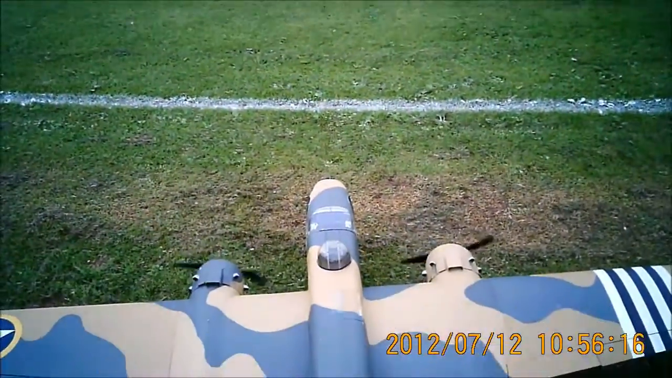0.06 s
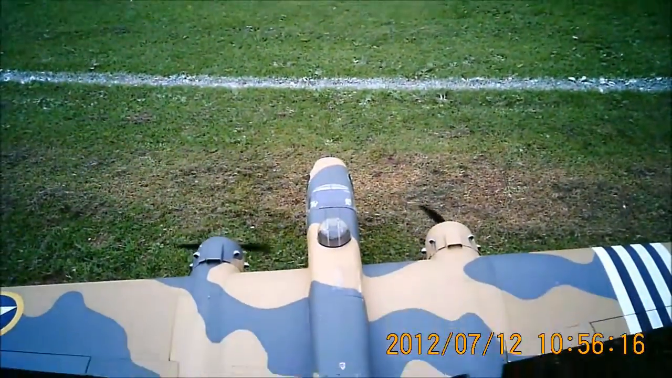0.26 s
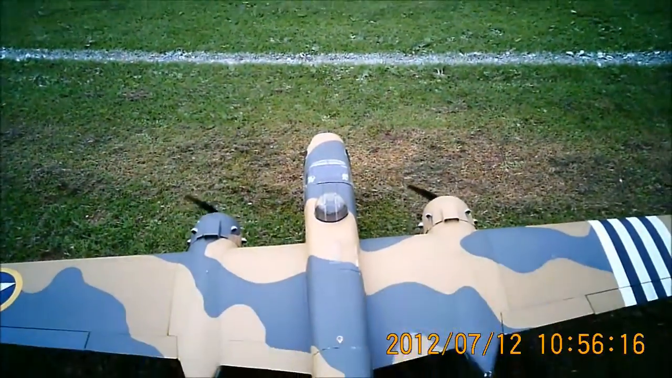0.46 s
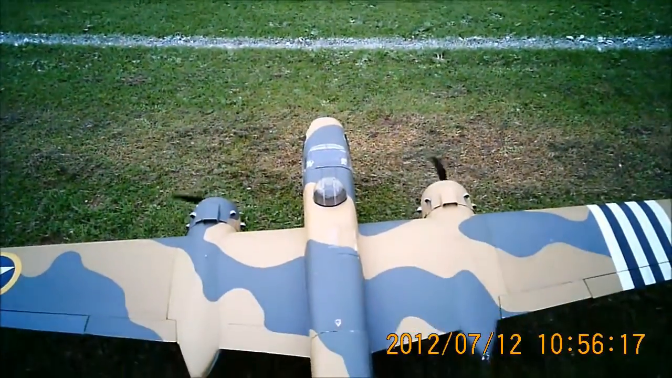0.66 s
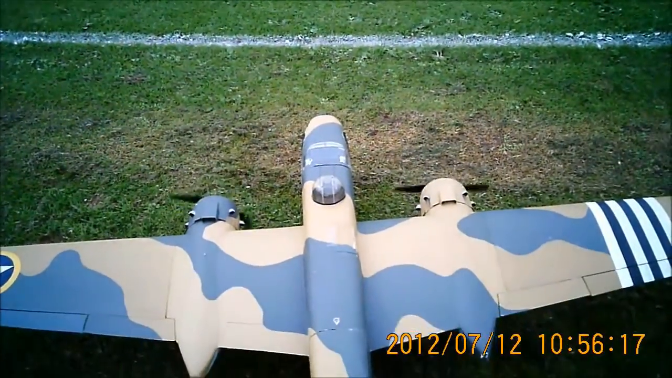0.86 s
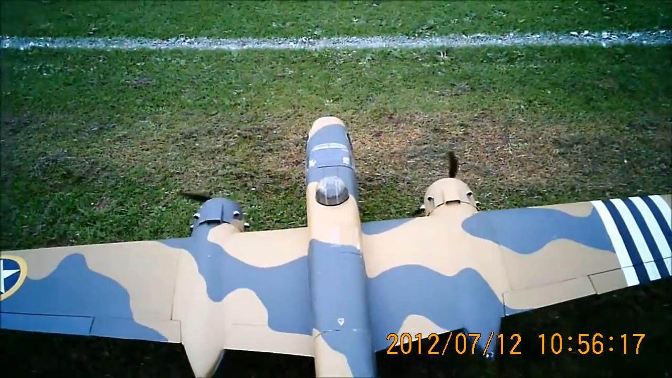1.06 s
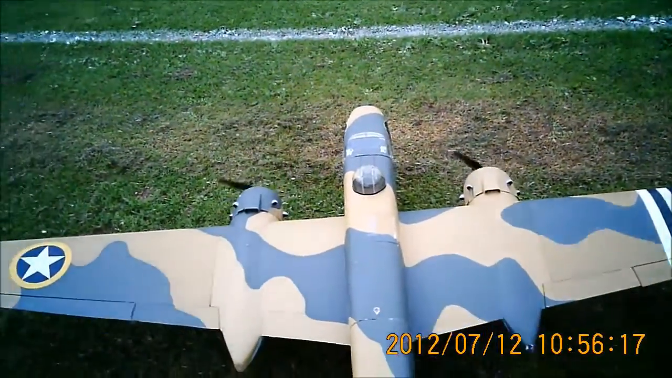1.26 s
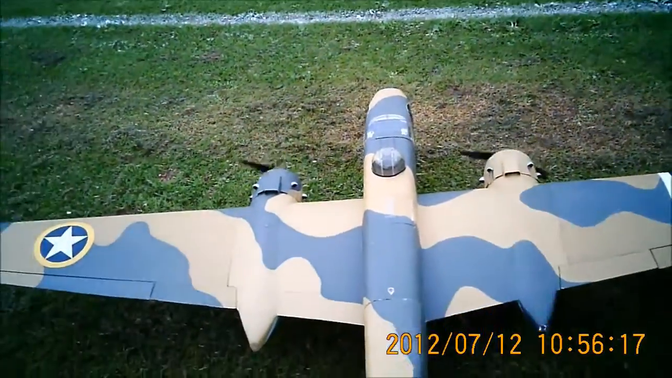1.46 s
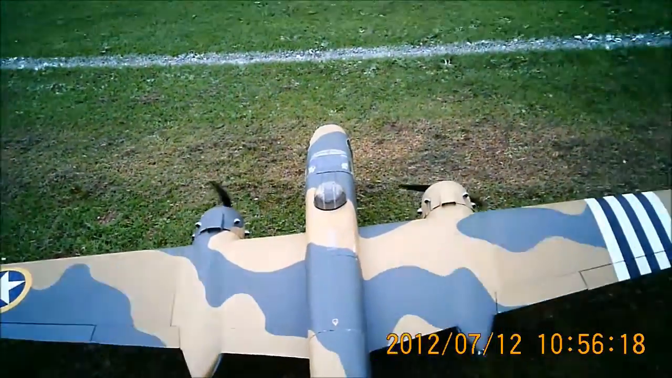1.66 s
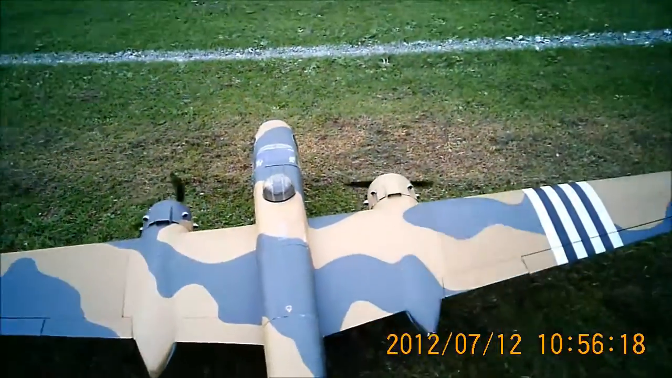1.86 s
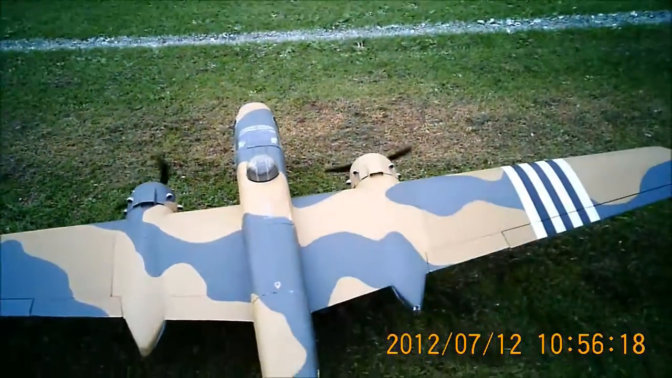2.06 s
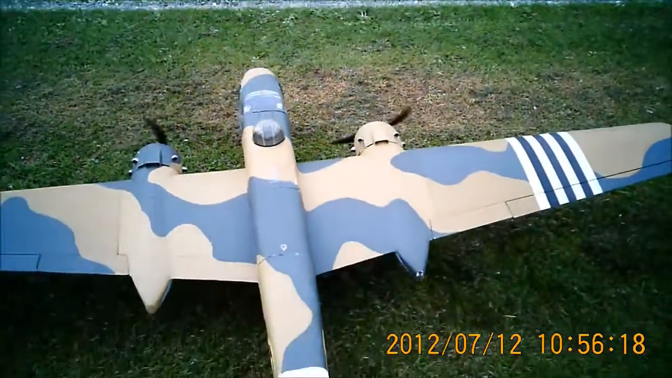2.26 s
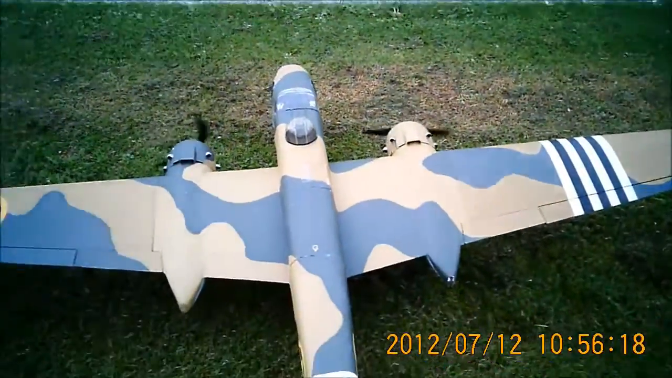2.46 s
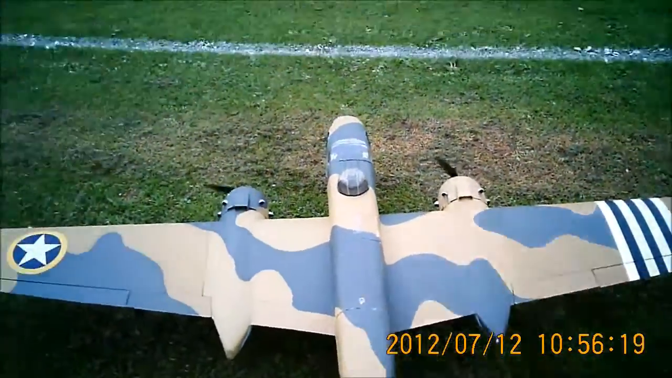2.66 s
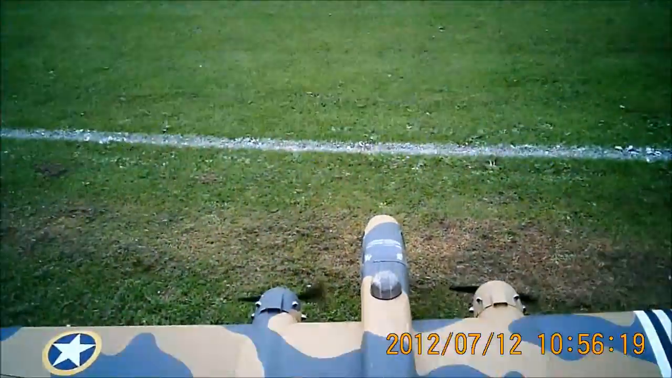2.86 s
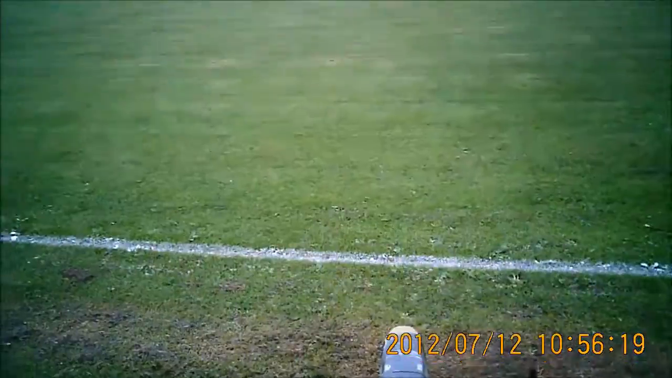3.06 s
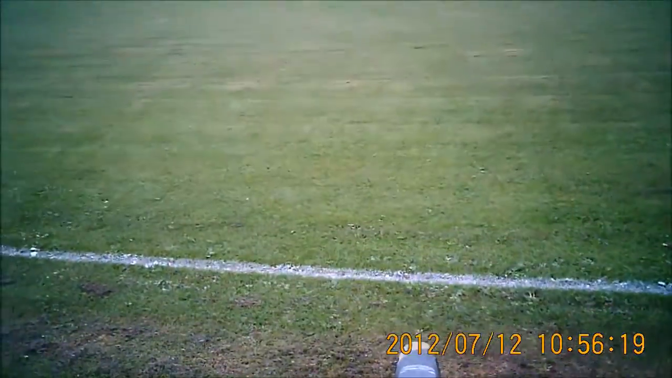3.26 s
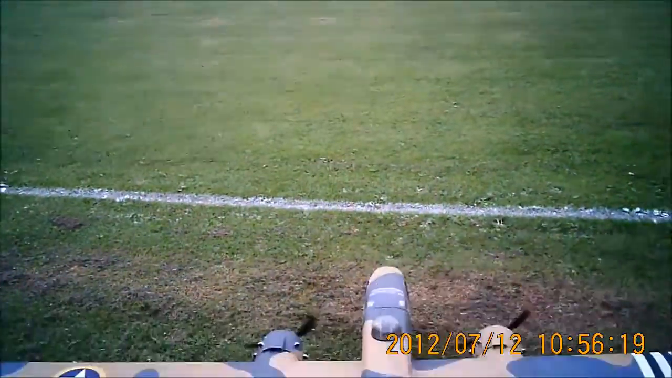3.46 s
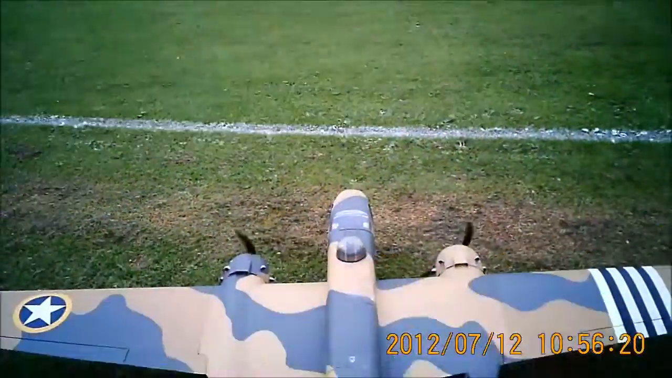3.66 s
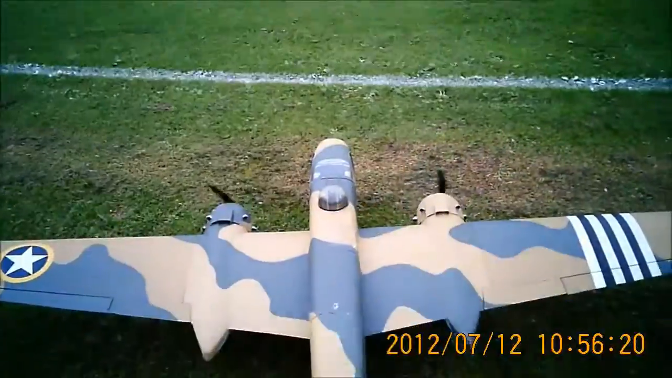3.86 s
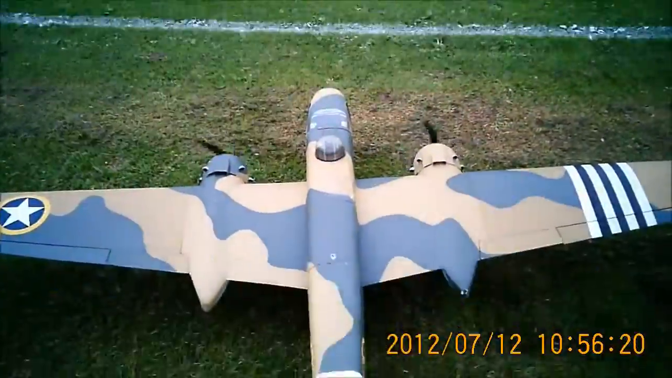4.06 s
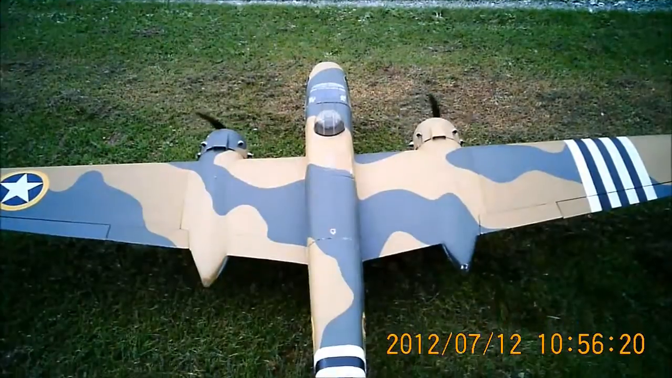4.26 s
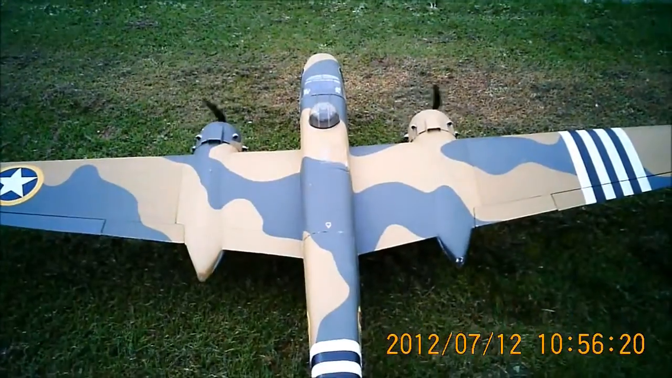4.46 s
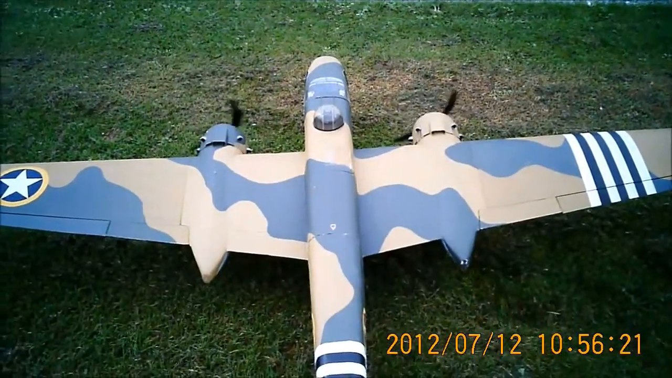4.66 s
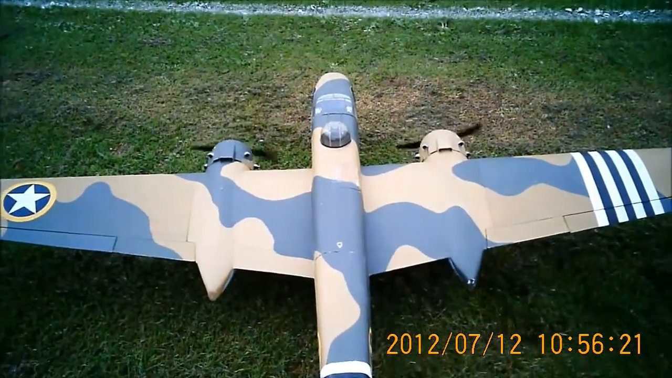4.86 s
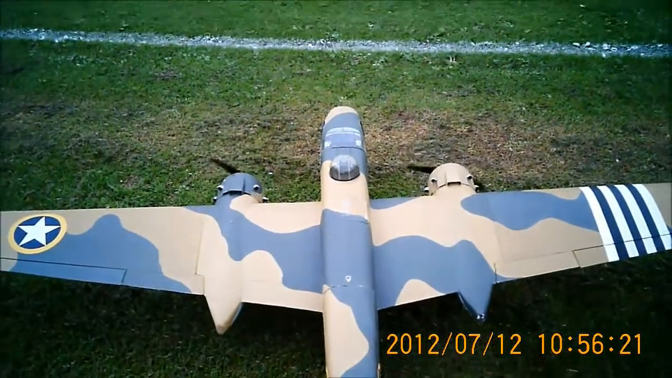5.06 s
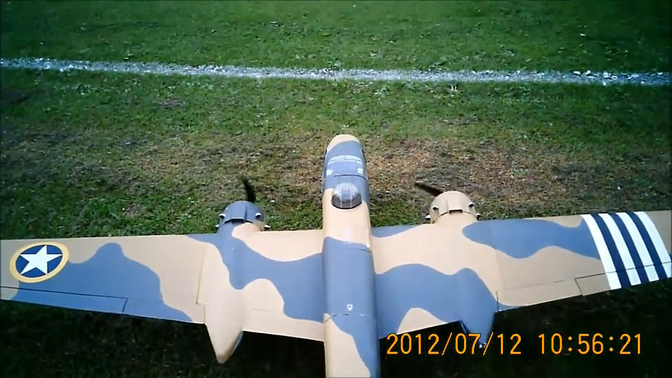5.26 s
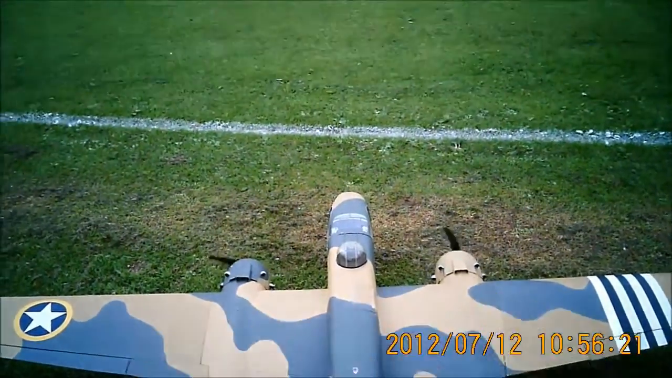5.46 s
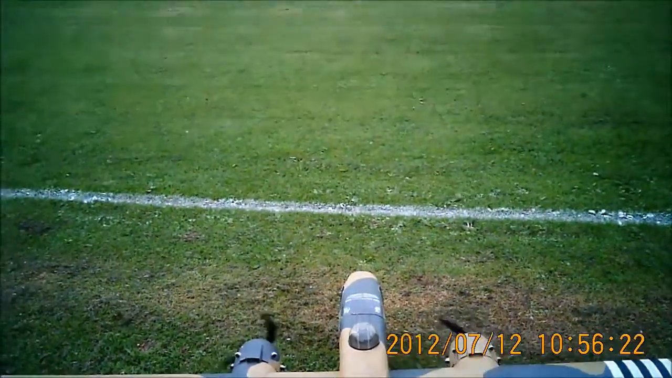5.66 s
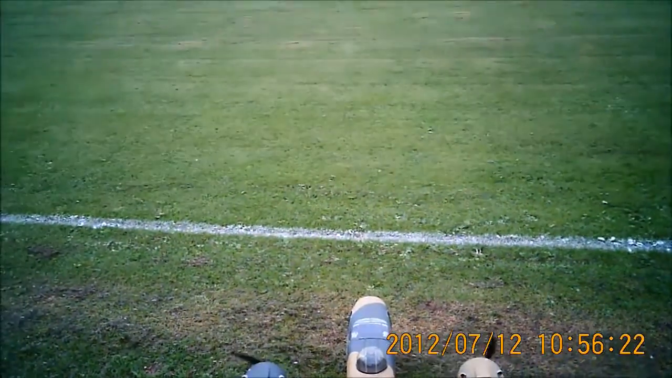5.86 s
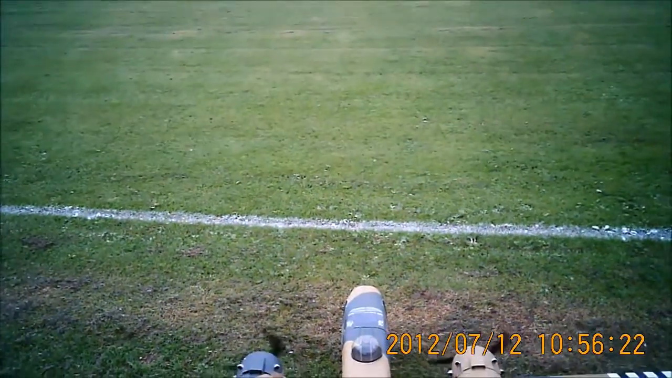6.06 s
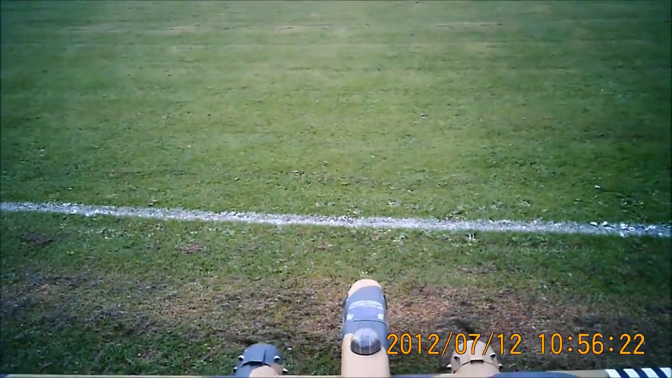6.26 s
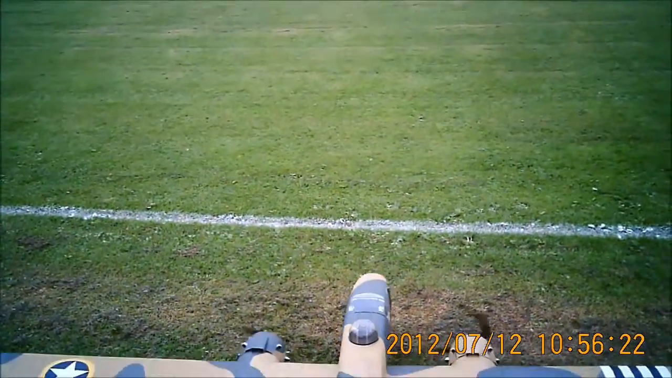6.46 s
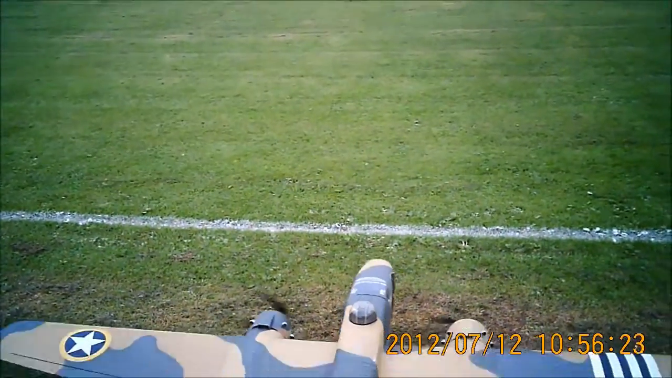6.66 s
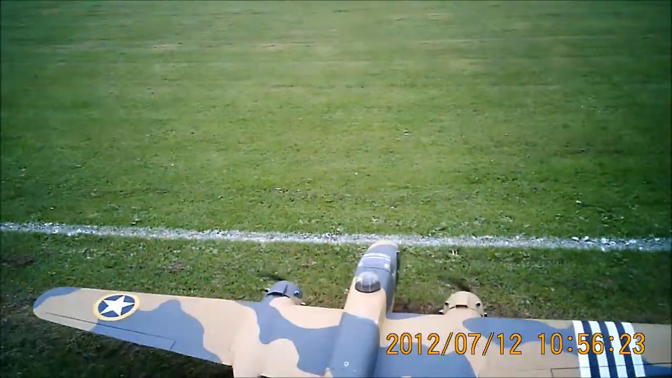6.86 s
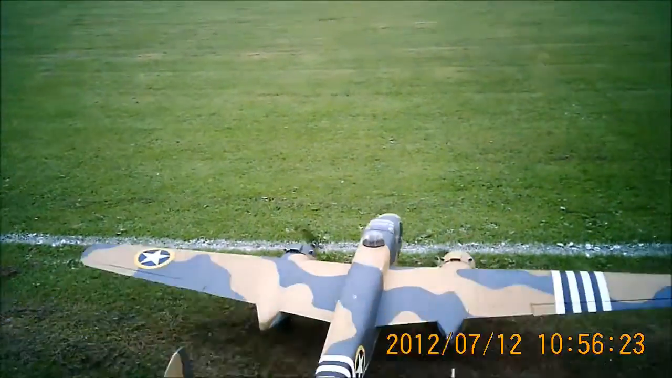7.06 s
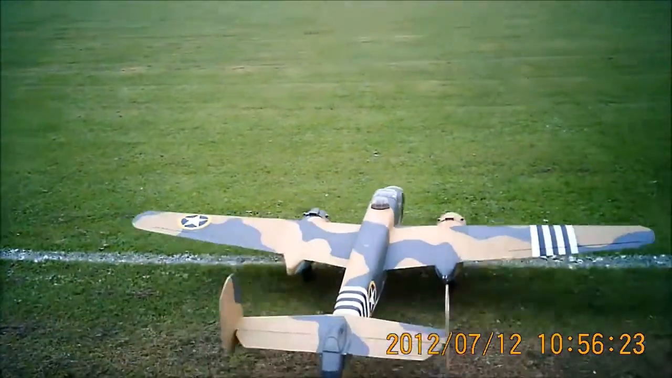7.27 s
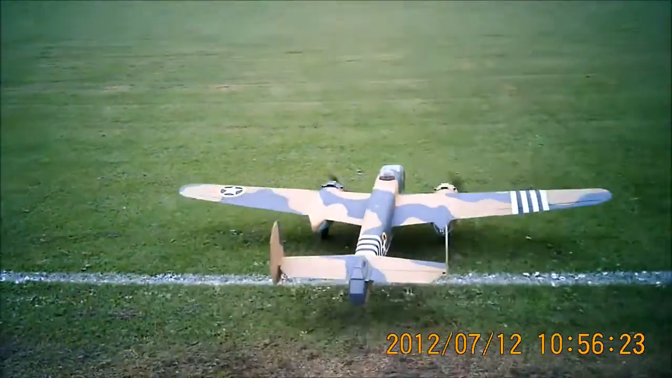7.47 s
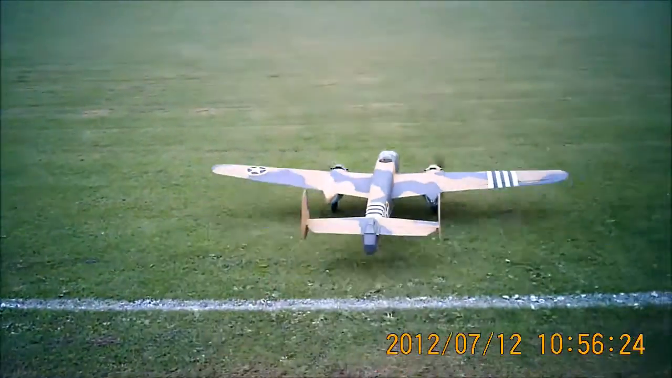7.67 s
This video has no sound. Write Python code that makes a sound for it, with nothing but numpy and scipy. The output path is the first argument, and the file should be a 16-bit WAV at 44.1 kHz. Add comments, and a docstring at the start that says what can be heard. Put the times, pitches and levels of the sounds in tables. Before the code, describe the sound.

Two small electric motors whirr unevenly with raspy bearings and faint high whistle, then surge upward in pitch to a loud buzzing propeller drone that recedes.

```python
"""A dull two-motor whine beats against itself over grassy idle rasp: a twin electric model aircraft,
then throttled up to droning, rushing propellers and rolling away. The motors sing at multiples of two unequal
shaft speeds through airframe resonances; bearings rasp and catch as coloured noise modulated by the turning;
speed controllers whistle as sidebands about a switching tone. Propellers are overtone stacks that grow with
speed, their wash is buffeting noise, and a light wind touches the microphone."""
import sys
import numpy as np
from scipy import signal
from scipy.fft import rfft, irfft, next_fast_len
from scipy.io import wavfile
from scipy.ndimage import uniform_filter1d

SR = 44100
rng = np.random.default_rng(int(sys.argv[2]) if len(sys.argv) > 2 else 0)


def output_pcm(signal):
    """Save a mono or channel-first signal as 16-bit PCM at the path in sys.argv[1].

    Samples are clipped to [-1, 1] before scaling.
    """
    pcm = np.clip(np.atleast_2d(signal).T, -1, 1) * 32767
    wavfile.write(sys.argv[1], SR, np.round(pcm).astype(np.int16))


N = 340011

# throttle-set speed of the motor that picks up first, and of the one that lags: (t/s, speed/(rev/s))
LEAD_SPEED = [(0, 40.4), (2.4, 40.37), (3.3, 40.62), (5.48, 40.42), (5.68, 45.1), (5.94, 47.4),
              (6.14, 83.8), (6.32, 100.9), (6.48, 113.3), (6.68, 116), (7.2, 114.3), (7.71, 113.3)]
LAG_SPEED = [(0, 24.9), (1.7, 24.97), (2.7, 25.6), (5.48, 25.12), (5.74, 28.1), (5.96, 29.3), (6.2, 43.5),
             (6.5, 65), (6.7, 86.3), (6.93, 110.5), (7.08, 113.1), (7.71, 112.2)]
# magnetic and unbalance forces: (multiple of shaft speed, relative idle level/dB, relative loaded level/dB)
LEAD_ORDERS = [(8, -58, -46), (12, -45, -46), (13, -43.5, -41), (14, -39, -41), (16, -44, -49),
               (6, -60, -42), (7, -63, -38), (10, -58, -55), (15, -52, -52), (18, -57, -52), (20, -58, -52),
               (25, -61, -51), (26, -59, -51), (27, -68, -49), (28, -66, -49), (29, -68, -49),
               (37, -59, -56), (42, -59, -50), (49, -63, -64)]
LAG_ORDERS = [(10, -49, -52), (11, -50.5, -50), (12, -38.5, -47), (13, -38.5, -33.5), (14, -46.5, -45),
              (15, -49.5, -52), (9, -55, -55), (16, -54, -50), (24, -56, -52), (25, -52, -47),
              (28, -59, -48), (29, -66, -46), (36, -58, -56), (37, -54.5, -54), (42, -69, -49),
              (47, -61, -62), (49, -55, -64)]
# whine strength: (t/s, lead gain/dB, lag gain/dB)
WHINE_GAIN = [(0, -5, -5), (.6, -1, -3.5), (1.4, 1, -2.5), (2.4, -0.5, 0.5), (5.5, -1, -0.5), (5.9, 4, 3.5),
              (6.1, -3, -6.5), (6.25, -2, 2), (6.8, -2.5, 2)]
# motor current: (t/s, load 0-1)
LOAD = [(0, 0), (5.5, 0), (5.62, 0.16), (5.93, 0.3), (5.97, 0.9), (6.15, 0.98), (7.71, 0.75)]
# resonances of wing, cowls and motor bells: (f/Hz, width/Hz, lift/dB)
AIRFRAME = [(255, 40, 5), (315, 60, 14), (495, 50, 9), (570, 70, 2), (1120, 90, 5), (1250, 60, 4),
            (1480, 70, 4), (1910, 110, 6), (2830, 120, 8), (3020, 100, 6), (4350, 520, 11),
            (5400, 550, -12)]
# a motor bell locks onto one order: (start t/s, length/s, multiple of shaft speed, peak level/dB)
LEAD_SQUEALS = [(0, 0.22, 42, -47), (0, 0.98, 49, -49), (2.75, 0.98, 77, -51), (5.986, .11, 42, -37),
                (6.06, .15, 14, -35), (6.17, .3, 7, -33), (6.19, 0.32, 42, -27), (6.347, 0.098, 28, -25),
                (6.38, .1, 14, -35), (6.38, 0.68, 42, -39.5), (6.9, 1.3, 28, -44), (6.904, 1.1, 14, -41),
                (6.9, 1.2, 42, -47.5)]
LAG_SQUEALS = [(0, 0.23, 13, -30), (.22, .68, 48, -48), (6.08, .16, 15, -32), (6.57, .11, 22, -33),
               (6.66, 0.2, 29, -29), (6.72, 0.27, 42, -33.5), (6.8, .11, 17, -32), (6.85, 1.2, 29, -44),
               (6.91, 0.24, 25, -28.5), (7.31, 0.2, 25, -36.5)]
# two-bladed propeller overtones at full speed: (multiple of shaft speed, relative level/dB)
PROP_ORDERS = [(1, -45.5), (2, -26.5), (3, -37), (4, -37.5), (5, -39), (6, -44)]
# wing boom as the aircraft strains forward: (peak t/s, half length/s, lift/dB)
WING_BOOM = (6.325, .052, 9.5)
# controller whistle: (offset from switching rate/shaft speeds, relative idle level/dB, strained level/dB)
SIDEBANDS = [(0, -58, -50), (2, -67, -57), (-2, -82, -72), (14, -70, -66), (-14, -68, -54),
             (-42, -57, -39.5)]
# colours of bearing rasp and hiss, idle and loaded: (f/Hz, relative density/dB)
IDLE_RASP = [(440, -36), (750, -25), (847, -9), (921, -1), (1110, -11), (1230, -3), (1420, -7),
             (1540, -4.5), (1610, -4.5), (3020, -7), (3350, -12.5), (4110, -4.5), (4860, -12.5), (6030, -9),
             (7000, -17.5), (9100, -25), (15400, -120)]
LOAD_RASP = [(440, -6.5), (750, -8), (1010, 0), (1150, 3), (1970, -3), (2120, 2), (2620, -27), (2830, -1.5),
             (3060, -1), (4500, -16), (5050, -16), (6010, -7), (7500, -22), (9750, -53), (16500, -120)]
IDLE_HISS = [(6500, -22), (7400, -4), (8600, -17.5), (9200, -7.5), (9800, 3), (10300, 0.5), (11100, 2),
             (11750, -7.5), (12350, 3.5), (13000, -14), (14400, -2), (15600, -14)]
LOAD_HISS = [(4120, -12), (7000, -3), (7360, -17), (7960, -14), (8040, -12.5), (10000, 3), (10700, 5),
             (11700, 0.5), (14300, -1), (14900, -11), (15700, -25)]
# idle noise shaded as the microphone swings off the motors and back: (t/s, hiss gain/dB, rasp gain/dB)
SHADE = [(0, -4.5, 1), (.9, .5, 0.5), (2.7, 1, 1.3), (3.0, -3.2, 1.3), (3.35, -3.5, 1.3), (3.65, -0.5, 0.4),
         (5.3, 0, 0.5), (5.8, 0.5, 1.5)]
# sharper catches of a bearing: (t/s, peak gain/dB)
CATCHES = [(0.8734, -30), (1.1212, -28), (6.507, -19)]
# motor bells rung by rough commutation: (f/Hz, relative density/dB)
BELL_GRIT = [(1000, -30), (1500, -9.5), (2300, 1.5), (2850, 6.5), (3500, -22), (4050, 0), (4600, 4),
             (4900, -22)]
# colours of slipstream and of wind: (f/Hz, relative density/dB)
WASH = [(60, -20), (130, -13.5), (220, -3), (300, -6.5), (400, -1), (490, -6), (700, -1.5), (950, -19.5),
        (1500, -20)]
WIND = [(10, -2.5), (25, -0.5), (50, -14), (64, -5.5), (85, -16.5), (140, -19), (300, -44), (800, -31)]
# gusts on the microphone: (peak t/s, half length/s, peak level/dB)
GUSTS = [(.08, 0.16, -33), (1.974, .05, -36), (2.935, 0.09, -30), (3.35, 0.11, -24.5), (5.77, 0.3, -35.5),
         (7.56, 0.055, -30)]

LEAD_SWITCH_HZ, LAG_SWITCH_HZ = 7729, 7699
# references for thrust and noise growth
IDLE_REV_PER_S, FULL_REV_PER_S = 48.2, 111.7
# each motor still closes in on its idle: (rev/s short at t = 0, time constant/s)
LEAD_SPIN_UP, LAG_SPIN_UP = (4.3, .34), (5.0, .5)
# (base level/dB, growth/(dB per tenfold speed), rise under full load/dB)
RASP_LAW, HISS_LAW = (-42.5, 19.7, 4.4), (-45.5, 23, 3.1)
ROLL_START_S, ROLL_M_PER_S2, DISTANCE_M = 6.72, 4.4, 1.09
WHINE_FALLOFF = 1.33  # x distance loss in dB: the tail screens the motors
WASH_FALLOFF = 0.3  # x distance loss in dB: the slipstream points back at the microphone
BREEZE_DB, BREEZE_SWING_DB = -38.5, 0.5
CUTOFF_HZ = 15700


def motor(speed, orders, load, scatter_turns, load_flutter_db):
    """Magnets passing stator teeth sing at shaft multiples; less phase scatter, deeper throb."""
    flutter_db = .25 + load * load_flutter_db
    whine = 0
    for k, idle_db, loaded_db in orders:
        level_db = idle_db + load * (loaded_db - idle_db) + flutter_db * drift(15.3)
        whine = whine + tone(k * speed, level_db, scatter_turns * rng.random())
    return whine


def shaft(table, spin_up, load, wobble=0.0011):
    """Shaft speed in rev/s: settles towards idle, follows the throttle, trembles under load."""
    short, settle_s = spin_up
    speed = in_time(table)[0] - short * np.exp(-np.arange(N) / SR / settle_s)
    return speed * (1 + wobble * load * drift(21))


def airframe(hz):
    """Complex gain of the airframe: each resonance lifts the level and turns the phase."""
    lift_db = sum(db / (1 + 2j * (hz - centre) / width) for centre, width, db in AIRFRAME)
    return 10 ** (lift_db / 20)


def tone(hz, level_db, start_turns=0):
    """A gliding sine that swells whenever it crosses an airframe resonance."""
    body = airframe(np.append(hz[::64], hz[-1]))
    turns = np.cumsum(hz) / SR + start_turns
    angle = (2 * np.pi * (turns - np.floor(turns))).astype(np.float32)
    wave = stretch(body.real, size=64) * np.cos(angle) - stretch(body.imag, size=64) * np.sin(angle)
    return np.sqrt(2) * from_db(level_db) * wave


def squeals(speed, rows, flutter_db=2.0):
    """A motor bell locked onto one shaft order: each squeal swells and fades."""
    t = np.arange(N) / SR
    angle = 2 * np.pi * np.cumsum(speed) / SR
    sound = 0
    for start_s, length_s, k, db in rows:
        swell = np.sin(np.pi * np.clip((t - start_s) / length_s, 0, 1))
        sound = sound + from_db(db) * swell * np.sin(k * angle)
    return np.sqrt(2) * sound * from_db(flutter_db * drift(40))


def propeller(speed, start_turns, growth_db=62, bite_db=4.5, turbulence_db=1.27):
    """Blade drone: grows steeply with speed, bites harder while accelerating, wavers in turbulence."""
    speed_db = growth_db * np.log10(speed / FULL_REV_PER_S) + bite_db * torque_of(speed)
    boom_db = wing_boom_db()
    drone = 0
    for (k, db), turns in zip(PROP_ORDERS, start_turns):
        level_db = db + speed_db + boom_db * (k > 2) + turbulence_db * drift(16.5)
        drone = drone + tone(k * speed, level_db, turns)
    return np.sqrt(thrust_of(speed)) * drone


def wing_boom_db():
    """The straining wing briefly lifts the propeller overtones."""
    peak_s, half_length_s, db = WING_BOOM
    return db * np.exp(-((np.arange(N) / SR - peak_s) / half_length_s) ** 2)


def thrust_of(speed):
    """0 up to the idle reference, 1 from full speed on."""
    return np.clip((speed - IDLE_REV_PER_S) / (FULL_REV_PER_S - IDLE_REV_PER_S), 0, 1)


def torque_of(speed, full_rev_per_s2=100):
    """0 at steady speed, 1 while the motor accelerates hard."""
    acceleration = uniform_filter1d(np.gradient(speed) * SR, size=2400)
    return np.clip(acceleration / full_rev_per_s2, 0, 1)


def drive_noise(lead, lag, load):
    """Bearings rasp and hiss, louder with speed; under load the air chopped by the blades takes over."""
    decades = np.log10(lead / IDLE_REV_PER_S)
    rasp_db, hiss_db = (base + growth * decades + rise * load for base, growth, rise in (RASP_LAW, HISS_LAW))
    hiss_shade_db, rasp_shade_db = in_time(SHADE)
    rasp_band, hiss_band = (1650, 2650), (9000, 15000)  # Hz, where rms is set to 1

    idle_rasp = noise(IDLE_RASP, rasp_band) * rubbing(lead, once_db=0.85, twice_db=0.4, grain_db=1.34)
    idle_rasp *= from_db(rasp_db + rasp_shade_db - 3.5)
    idle_hiss = noise(IDLE_HISS, hiss_band) * scraping(lead) * from_db(hiss_db + hiss_shade_db)

    load_rasp = noise(LOAD_RASP, rasp_band) * rubbing(lead, once_db=2.0, twice_db=4.0, grain_db=3.0)
    load_rasp *= from_db(rasp_db - 5.5)
    load_hiss = noise(LOAD_HISS, hiss_band) * rubbing(lag, once_db=2.5, twice_db=1.5, grain_db=1.4)
    load_hiss *= from_db(hiss_db - 1.4)
    return np.sqrt(1 - load) * (idle_rasp + idle_hiss) + np.sqrt(load) * (load_rasp + load_hiss)


def rubbing(speed, once_db, twice_db, grain_db):
    """Friction gain, rms 1: swells once and twice per turn, with a gritty grain."""
    angle = 2 * np.pi * np.cumsum(speed) / SR
    gain = from_db(once_db * np.cos(angle) + twice_db * np.cos(2 * angle) + grain_db * drift(290))
    return gain / np.sqrt(np.mean(gain ** 2))


def scraping(speed, decay_turns=0.2, second_db=-6, steady_db=-9, grain_db=2.0):
    """Bearing gain, rms 1: catches twice per turn, hard then lightly, each dying away from a sharp onset."""
    count, half_turn_part = np.divmod(2 * np.cumsum(speed) / SR, 1)
    count = count.astype(int)
    chance_db = rng.standard_normal(count[-1] + 1)[count]
    strength = from_db(second_db * (count % 2) + chance_db)
    scrape = strength * np.exp(-half_turn_part / (2 * decay_turns))
    gain = (from_db(steady_db) + scrape) * from_db(grain_db * drift(260))
    return gain / np.sqrt(np.mean(gain ** 2))


def catches(decay_s=.002):
    """A few scrapes stand out as ticks: noise with a sharp onset and exponential decay."""
    t = np.arange(N) / SR
    envelope = sum(from_db(db) * (t >= s) * np.exp(-np.abs(t - s) / decay_s) for s, db in CATCHES)
    return envelope * (noise(IDLE_RASP) + .5 * noise(IDLE_HISS))


def surge(speed, load, level_db, sputter_db=3):
    """Current spikes make the motor bell sputter under hard acceleration."""
    sputter = noise(BELL_GRIT) * from_db(level_db + sputter_db * drift(30))
    return torque_of(speed) * np.sqrt(load) * sputter


def buzz(speed, load, level_db, low_hz=520, high_hz=3000):
    """Fine roughness repeats every turn under load: a dense fan of faint overtones."""
    overtones = rng.standard_normal(size=56) + 1j * rng.standard_normal(size=56)
    one_turn = irfft(np.append(0, overtones), 2048)
    one_turn /= one_turn.std()
    wave = np.interp(np.cumsum(speed) / SR % 1, np.linspace(0, 1, len(one_turn)), one_turn)
    band = signal.butter(2, [low_hz, high_hz], "band", fs=SR, output="sos")
    return load * from_db(level_db) * signal.sosfilt(band, wave) * speed / FULL_REV_PER_S


def controller(speed, load, switch_hz, octave_db=-67, fade_rev_per_s=30, strain_rev_per_s=30):
    """Switching whistle, split by commutation more as the motor strains; stops at full speed."""
    chopping = np.clip((FULL_REV_PER_S - speed) / fade_rev_per_s, 0, 1)
    strain = load * np.clip((speed - IDLE_REV_PER_S) / strain_rev_per_s, 0, 1)
    whistle = tone(np.full(N, 2. * switch_hz), octave_db)
    for k, idle_db, strained_db in SIDEBANDS:
        level_db = idle_db + strain * (strained_db - idle_db + 2 * drift(25))
        whistle = whistle + tone(switch_hz + k * speed, level_db)
    return chopping * whistle


def prop_wash(speed, idle_db=-44.0, full_db=-34):
    """The slipstream buffets the wing and stirs its resonances."""
    size = next_fast_len(N)
    body = airframe(np.fft.rfftfreq(size, 1 / SR))
    buffet = irfft(rfft(noise(WASH), size) * body, size)[:N]
    return buffet * from_db(idle_db + thrust_of(speed) * (full_db - idle_db))


def receding_db():
    """Level change as the aircraft rolls away at steady acceleration: inverse distance."""
    rolled_m = .5 * ROLL_M_PER_S2 * np.maximum(np.arange(N) / SR - ROLL_START_S, 0) ** 2
    return -20 * np.log10(1 + rolled_m / DISTANCE_M)


def wind():
    """A restless breeze on the microphone, with gusts that swell and fade."""
    t = np.arange(N) / SR
    gusts = sum(from_db(db) * np.exp(-((t - s) / half_length_s) ** 2) for s, half_length_s, db in GUSTS)
    breeze = from_db(BREEZE_DB + BREEZE_SWING_DB * drift(1.6))
    return np.hypot(breeze, gusts) * noise(WIND)


def noise(spectrum, band=(0, SR)):
    """Gaussian noise coloured by a log-frequency curve, rms 1 inside the band (Hz)."""
    size = next_fast_len(N)
    hz = np.maximum(np.arange(size // 2 + 1) * SR / size, 1)
    points_hz, points_db = np.transpose(spectrum)
    gain = from_db(np.interp(np.log(hz), np.log(points_hz), points_db, left=-100, right=-100))
    gain /= np.sqrt(np.mean(gain ** 2 * (hz > band[0]) * (hz < band[1])))
    return irfft(rfft(rng.standard_normal(size)) * gain, size)[:N]


def drift(rate_hz):
    """Smooth chance with spread 1: noise through a double pole, one point per 100 samples."""
    r = np.exp(-200 * np.pi * rate_hz / SR)
    chance = rng.standard_normal(N // 100 + 1002)
    slow = signal.lfilter([1], [1, -2 * r, r * r], chance)[1000:]  # drop the filter's run-in
    return stretch(slow / slow.std(), size=100)


def stretch(points, size):
    """Straight lines through points `size` samples apart."""
    return (points[:-1, None] + np.diff(points)[:, None] * (np.arange(size) / size)).ravel()[:N]


def in_time(rows):
    """The columns of a curve table at every sample."""
    s, *columns = np.transpose(rows)
    return [np.interp(np.arange(N) / SR, s, c) for c in columns]


def from_db(db):
    """Decibels to gain."""
    return np.exp(np.asarray(db) * (np.log(10) / 20))


def scene():
    """Both drives on one throttle, fading as the aircraft rolls away, and the wind."""
    load = np.clip(in_time(LOAD)[0], 0, 1)
    lead, lag = shaft(LEAD_SPEED, LEAD_SPIN_UP, load), shaft(LAG_SPEED, LAG_SPIN_UP, load)
    lead_db, lag_db = in_time(WHINE_GAIN)
    away_db = receding_db()

    whine = from_db(lead_db) * motor(lead, LEAD_ORDERS, load, scatter_turns=0.31, load_flutter_db=3.5)
    whine += from_db(lag_db) * motor(lag, LAG_ORDERS, load, scatter_turns=0.43, load_flutter_db=3.5)
    squeal = squeals(lead, LEAD_SQUEALS) + squeals(lag, LAG_SQUEALS)

    start_turns = rng.random(len(PROP_ORDERS))  # propellers alike, so they beat as their speeds meet
    drone = propeller(lead, start_turns) + from_db(-3) * propeller(lag, start_turns)

    grit = drive_noise(lead, lag, load) + catches()
    grit += surge(lead, load, level_db=-33) + surge(lag, load, level_db=-34.5)
    grit += buzz(lead, load, level_db=-35.5) + buzz(lag, load, level_db=-31)

    whistle = controller(lead, load, LEAD_SWITCH_HZ)
    whistle += from_db(-3.5) * controller(lag, load, LAG_SWITCH_HZ)
    wash = from_db(WASH_FALLOFF * away_db) * prop_wash(lead)

    receding = from_db(WHINE_FALLOFF * away_db) * whine + from_db(away_db) * (drone + grit) + wash
    return (receding + squeal + whistle + wind())[None]


def record(dry):
    """Steep elliptic low-pass: the top is cut."""
    low_pass = signal.ellip(12, .1, 90, CUTOFF_HZ, fs=SR, output="sos")  # order, ripple/dB, stop/dB
    return signal.sosfilt(low_pass, dry)


dry = scene()
out = record(dry)
output_pcm(out)
```